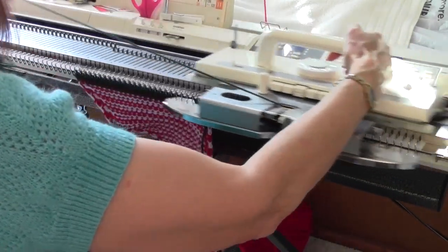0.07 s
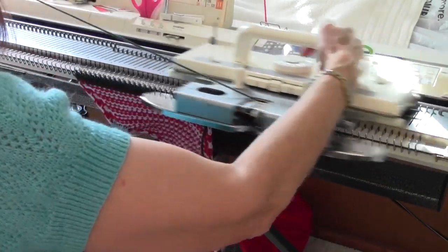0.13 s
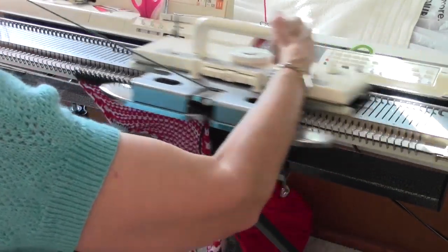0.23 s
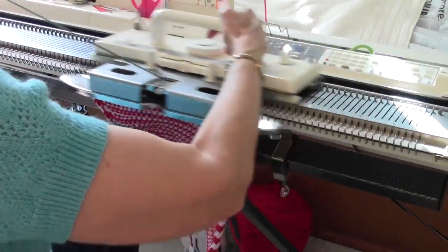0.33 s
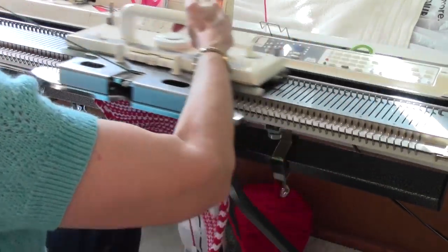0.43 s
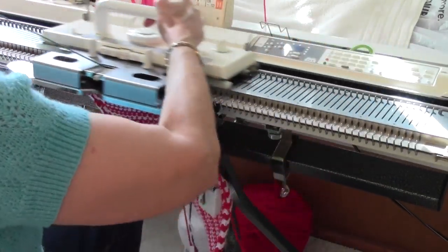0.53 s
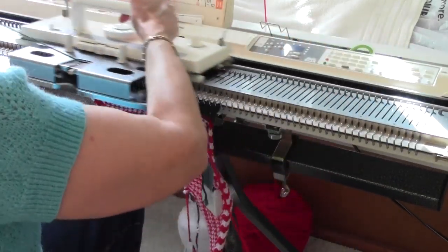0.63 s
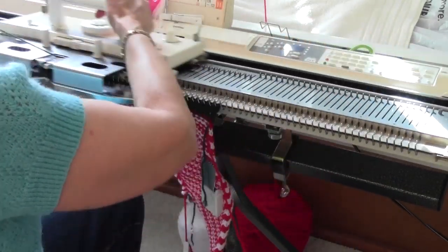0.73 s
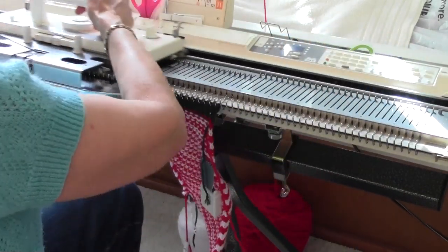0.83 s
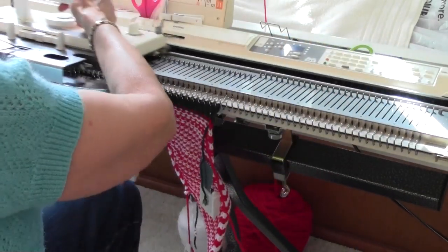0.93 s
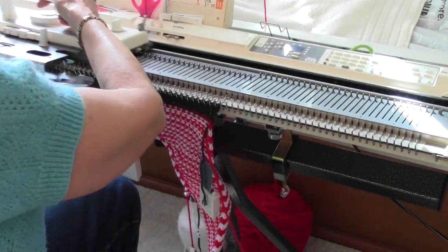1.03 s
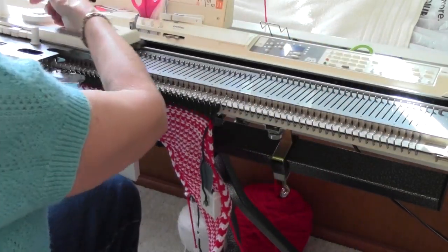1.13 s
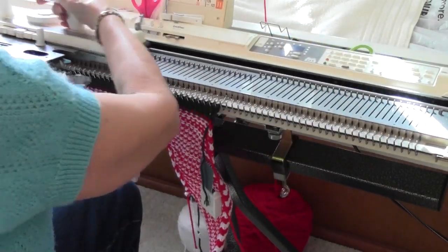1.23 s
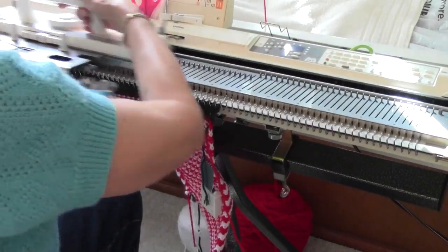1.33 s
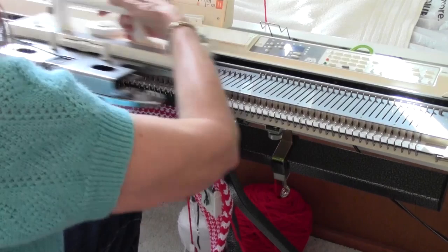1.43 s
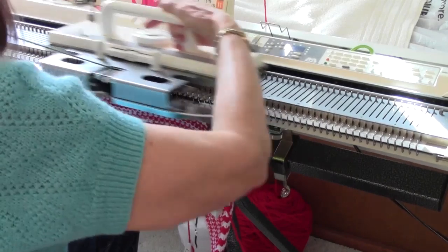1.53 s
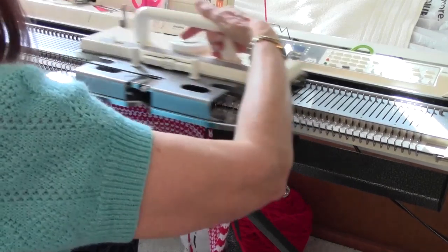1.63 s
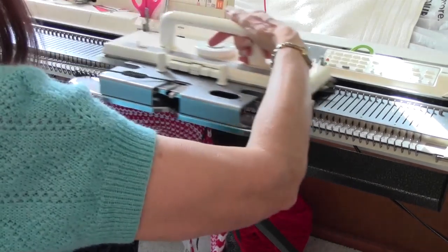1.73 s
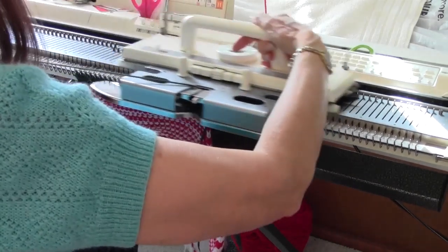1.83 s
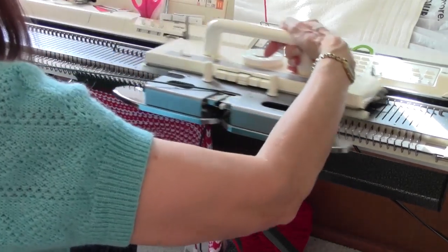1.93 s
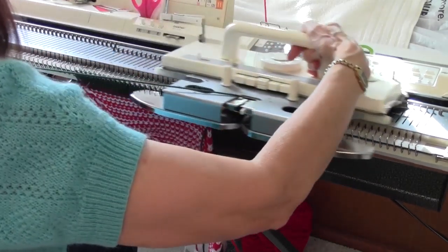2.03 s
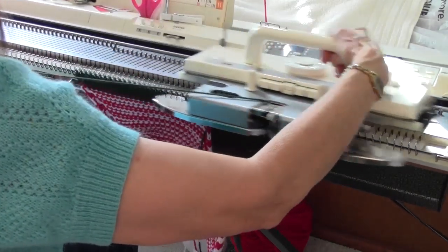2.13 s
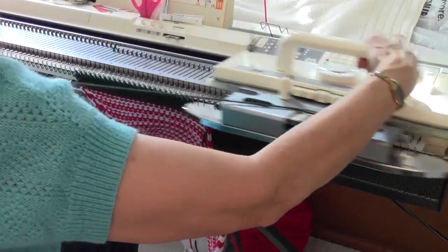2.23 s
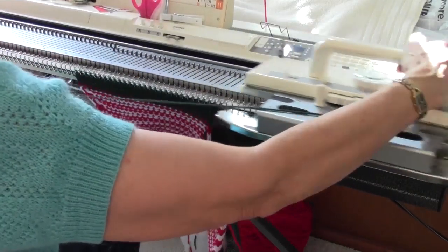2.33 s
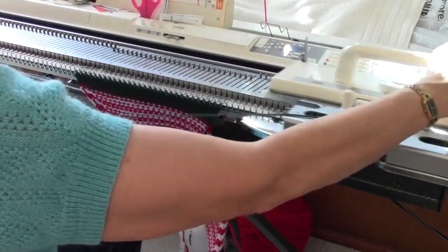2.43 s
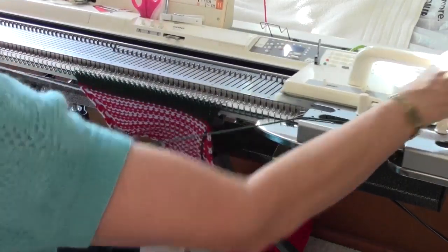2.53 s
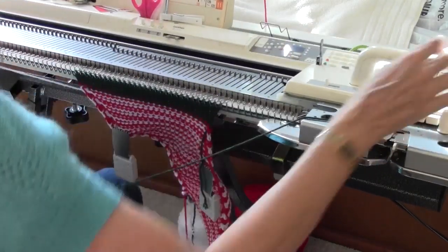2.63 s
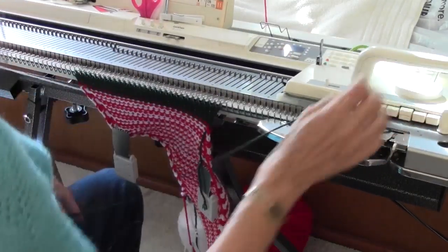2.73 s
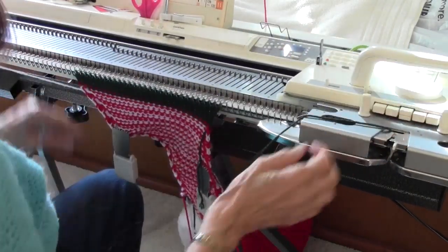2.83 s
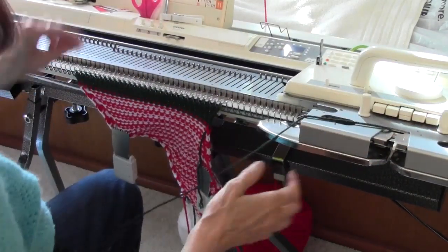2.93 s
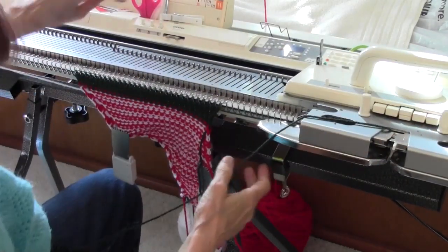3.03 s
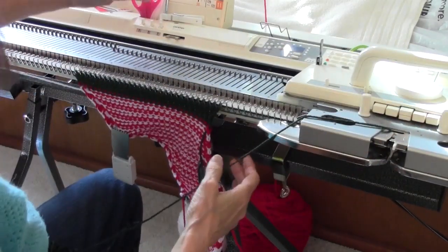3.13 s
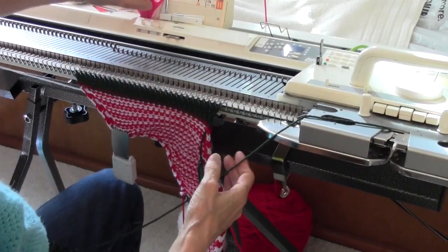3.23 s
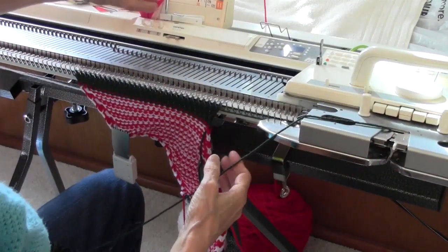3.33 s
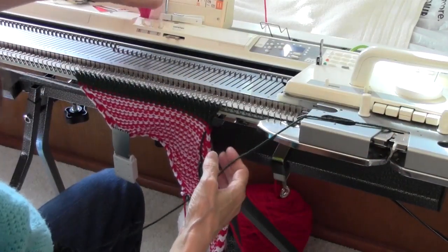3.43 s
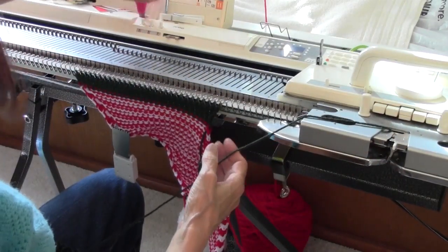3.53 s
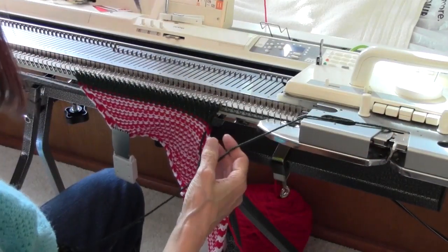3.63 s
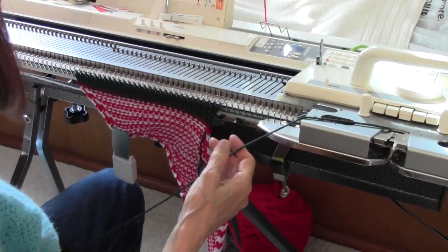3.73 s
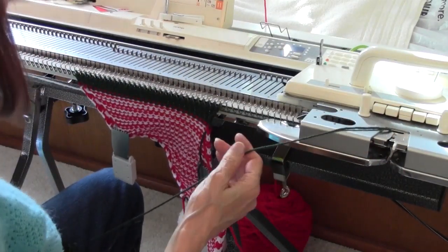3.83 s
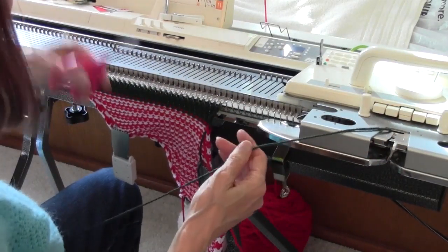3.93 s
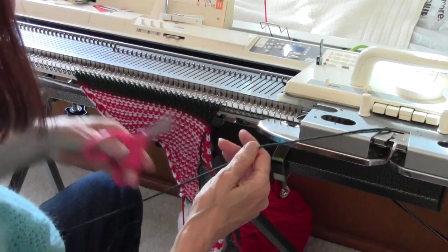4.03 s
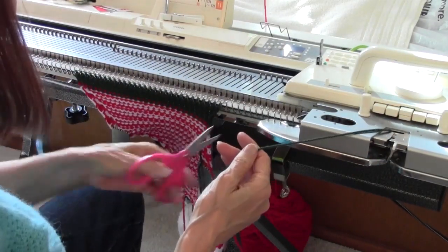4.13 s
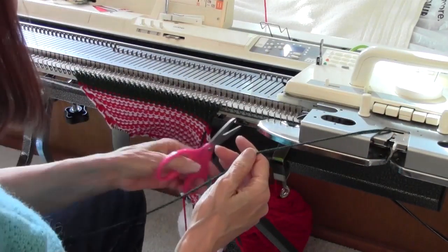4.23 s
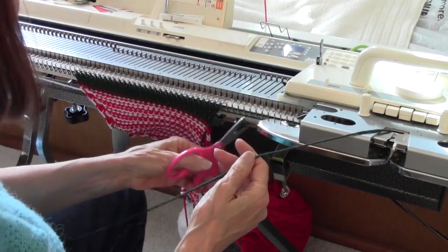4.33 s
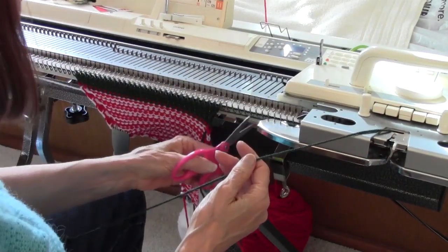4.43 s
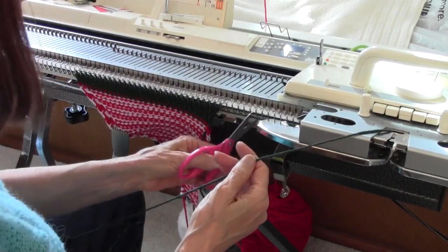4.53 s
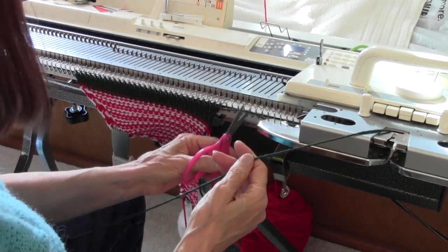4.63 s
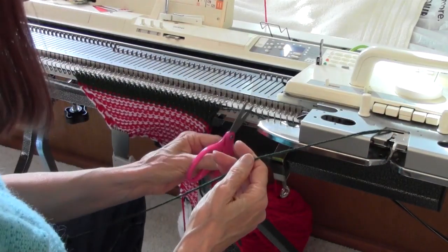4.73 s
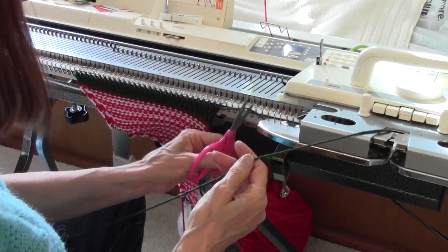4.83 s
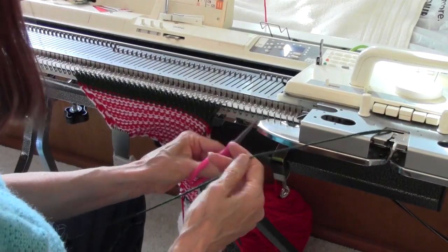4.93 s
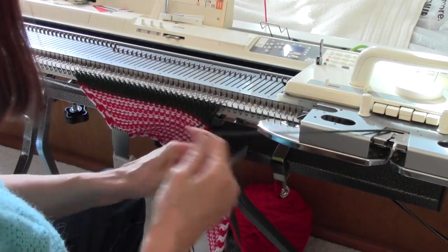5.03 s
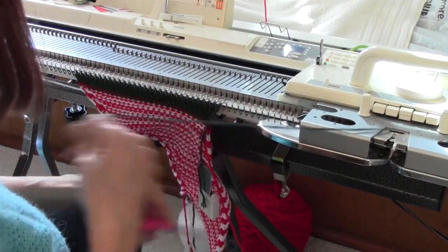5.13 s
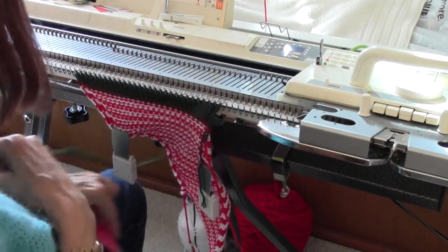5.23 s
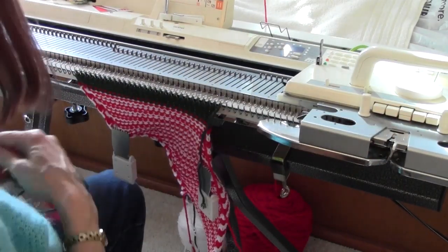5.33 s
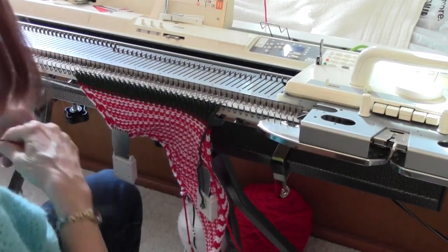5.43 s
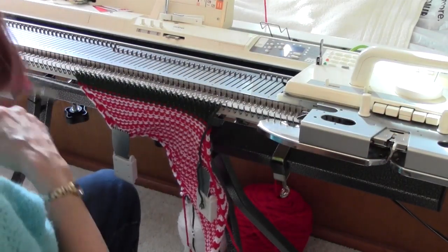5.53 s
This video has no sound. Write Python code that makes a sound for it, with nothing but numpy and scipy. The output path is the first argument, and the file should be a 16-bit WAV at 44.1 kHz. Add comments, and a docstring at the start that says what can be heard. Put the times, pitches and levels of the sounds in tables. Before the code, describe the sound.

Two fast, bright ratcheting strokes of steel needles, nearly a second each, dominate the start, with hard knocks at the ends of travel. Then quieter handling: a sharp knock and loose clatter of scissors against plastic, a pause, small crisp blade clicks and one dry snip through yarn. Close microphone, centred sources, short indoor reflections and steady low room rumble.

```python
"""A small room with a steady low hush; close by, a knitting machine's carriage is pushed left, then back.
Its cams rake the steel needles: bursts of needle hits ring the bed, and the needles ring high above it.
Knocks and lever snaps clack at the ends of each stroke, and the rail groans after the second.
Then scissors scrape and rattle out of a holder behind the machine, ringing its plastic.
The blades click open, rasp once through the yarn and click again; reflections surround it all."""
import sys
import numpy as np
from scipy import signal
from scipy.fft import rfft, irfft
from scipy.io import wavfile

SR = 44100
rng = np.random.default_rng(int(sys.argv[2]) if len(sys.argv) > 2 else 0)


def waveform_to_disk(signal):
    """Save audio, clipped to [-1, 1], as 16-bit WAV at the path in sys.argv[1]."""
    frames = np.transpose(np.atleast_2d(signal))
    scaled = np.clip(frames, -1, 1) * 32767
    samples = np.round(scaled).astype(np.int16)
    wavfile.write(sys.argv[1], SR, samples)


N = 246069

# Carriage pushes: start_s, length_s, run_up_s to the needles, on_needles_s, level_db,
# sag_db_per_s, shove_at_s (a second shove), shove_db
STROKES = [(0.199, .92, 0.047, .68, -15, 13.5, .68, 0.61), (1.427, .87, 0.037, 0.72, -13, 21, 2.02, 3.5)]
# The needles' ring over time: time_s, pitch_hz, unison_share (0-1)
NEEDLE_RING = [(0.25, 10450, .9), (0.38, 10520, 0.6), (0.55, 10460, 0), (1.0, 10290, .05),
               (1.55, 10340, .05), (1.8, 9760, 0.15), (2.05, 10550, 0.57)]
# Spectrum of needles and rail: frequency_hz, relative_db per Hz
CLATTER_SPECTRUM = [(100, -39), (200, -28.5), (340, -11.5), (430, -12), (520, 0), (780, -2.5), (1150, 0),
                    (2000, -0.5), (3500, -1), (6000, 0), (8500, -1), (11500, -2.5), (13200, -7.5),
                    (16000, -9)]
# Steel parts of the needle bed: pitch_hz, relative_db, t60_s
BED_MODES = [(523, -0.5, 0.099), (954, 5, .18), (1195, -2, 0.449), (1364, -4.5, 0.14), (1433, -3, 0.28),
             (1552, 3, 0.4), (2240, -1, 0.22), (2680, 2.5, 0.17), (2923, 3, 0.34), (3433, -1, .16),
             (3670, -3.5, 0.155), (3890, 3.5, 0.073), (4924, 7.5, 0.07), (6080, 6, 0.084)]
# Carriage knocks on the bed: start_s, relative_db, tilt_db_per_octave
CLACKS = [(.096, -45.5, -4), (.12, -43, -1), (.145, -46.5, 1.5), (.1965, -29, 0.5), (.209, -26.5, 2),
          (1.055, -15, -0.5), (1.0595, -7, 0), (1.427, -28.5, 2), (2.489, -33, -6.5), (2.527, -44, -2)]
# Spectrum of those knocks: frequency_hz, relative_db per Hz
CLACK_SPECTRUM = [(30, -70.5), (200, -16.5), (400, -6), (550, 9.5), (800, -4), (1200, 1.5), (2500, 2.5),
                  (4200, 0.5), (7000, 2), (11000, 4), (16000, -15)]
# Levers and cams snapping over at the ends of the bed: start_s, relative_db, tilt_db_per_octave
LEVERS = [(.9625, -5.5, 2.5), (.9775, -9, 0.5), (1.012, -13, 0.5), (1.06, -1, 8), (2.1264, -13, 1),
          (2.158, -12, 0), (2.1965, -5, 0.5), (2.211, -10.5, -2), (2.2646, -15, -2)]
# Spectrum of those snaps: frequency_hz, relative_db per Hz
LEVER_SPECTRUM = [(100, -64), (1100, -18), (1800, -1), (5000, 1.5), (8200, -3.5), (11000, 0),
                  (16000, -20.5)]
# Stops of the carriage, taken by the table: start_s, relative_db
THUDS = [(1.061, -41.5), (2.489, -35), (2.503, -41), (2.528, -44.5)]
# The table's answer to a stop: pitch_hz, relative_db, t60_s
TABLE_MODES = [(125.7, -7.5, 0.4), (148, -3, 0.085), (332.3, 2, 0.076), (475, -25, 0.049),
               (546, 10, 0.0998), (590.6, -11, .06), (750, 4, 0.079)]
# The carriage dragging on its bare rail: start_s, length_s, level_db, pitch_hz
DRAGS = [(2.168, .14, -33.5, 1830), (2.343, 0.138, -46.5, 575)]
# Spectrum of the table's rumble: frequency_hz, relative_db per Hz
RUMBLE_SPECTRUM = [(20, -3), (60, -11.5), (130, 0.5), (220, -3.5), (400, -27.5), (2000, -78.5)]
# Steel parts set ringing by a blow or a scrape: start_s, level_db, pitch_hz, t60_s
PINGS = [(1.011, -31, 3920, .2), (1.06, -24.5, 3860, 0.32), (1.064, -23.5, 1160, 0.28),
         (3.513, -41, 11400, 0.09), (3.566, -42, 11300, 0.28)]
# Scissors knocking against their holder: start_s, level_db, tilt_db_per_octave
RATTLES = [(3.304, -38, -4), (3.324, -24.5, 1.5), (3.3275, -14.5, 3), (3.437, -36, 6), (3.456, -28.5, 1.5),
           (3.471, -34, 4), (3.51, -29, -1.5), (3.517, -24.5, 2.5), (3.527, -24.5, -0.5), (3.566, -31, 9),
           (3.6345, -28.5, -3), (3.669, -24.5, -0.5), (3.685, -20.5, 2.5), (3.703, -26.5, -.5),
           (3.7657, -33, -1.5), (3.786, -39, -4)]
# Spectrum of those knocks and of the sliding: frequency_hz, relative_db per Hz
RATTLE_SPECTRUM = [(30, -69.5), (250, -23), (400, -8), (560, 7), (830, -1), (1200, 4.5), (1700, -1),
                   (2300, 5.5), (3400, 1), (4400, -3), (5200, -9), (8500, -14), (11000, -16), (16000, -30)]
# Hand and scissors sliding on the holder: start_s, length_s, level_db
SCRAPES = [(2.908, 0.15, -59.5), (3.333, 0.061, -37.5), (3.455, 0.097, -41.5), (3.551, 0.073, -38.5),
           (3.717, 0.057, -41.5), (4.068, .025, -50.5)]
# The plastic holder: pitch_hz, relative_db, t60_s
HOLDER_MODES = [(542, -8, 0.096), (620, -6, 0.11), (1220, -12, 0.15), (2120, 2.5, 0.081), (2370, -2, 0.064),
                (3250, -3, 0.14), (3560, -10, 0.15), (4330, -5, 0.088), (5400, 0, .12), (7590, -18, .25),
                (11600, -12, 0.28)]
# Clicks of the blades: start_s, level_db, tilt_db_per_octave
SNIPS = [(4.5787, -20, 2), (4.5978, -29.5, -2), (4.6557, -33, .5), (4.669, -36.5, -3.5), (4.695, -29.5, 4),
         (4.713, -40, -2.5), (4.9944, -41, -6), (5.0215, -36, -3), (5.0245, -20.5, 0.5), (5.3047, -29, 9.5)]
# Spectrum of those clicks: frequency_hz, relative_db per Hz
SNIP_SPECTRUM = [(30, -63), (300, -10.5), (750, 3.5), (1800, -3.5), (3800, -1.5), (7500, 3), (10000, 2),
                 (16000, -10.5)]
# The steel blades: pitch_hz, relative_db, t60_s
BLADE_MODES = [(850, -3, 0.18), (1295, -2, 0.45), (1685, -3, 0.112), (2420, -3, 0.11), (3828, -6, 0.16),
               (5790, -6, 0.1), (9900, -4, 0.1), (12020, -11, 0.11)]
# The blades shearing through the yarn: start_s, level_db, tilt_db_per_octave
CUTS = [(5.026, -38.5, -2.5)]
# Spectrum of the cut yarn: frequency_hz, relative_db per Hz
SHEAR_SPECTRUM = [(100, -61), (1500, -27), (3000, -12), (4200, -1), (6600, 0), (7800, -18), (16000, -25)]
# Decay of the small room: frequency_hz, t60_s
ROOM_DECAY = [(150, 0.59), (1000, .36), (4000, 0.36), (9000, 0.19), (16000, 0.23)]
# How far the reflections differ left and right: frequency_hz, side_to_mid_db
SPREAD = [(300, -6), (1000, -25), (2500, -84.5), (4500, -23), (9000, -5), (13000, -8)]
# Spectrum of the room's hush: frequency_hz, relative_db per Hz
HUSH_SPECTRUM = [(12, -33.5), (20, -4.5), (107, -2), (142, 1.5), (241, -7.5), (270, -2), (337, -9.5),
                 (410, -5.5), (446, -10), (698, -10.5), (825, -16.5), (897, -14), (2530, -22.5),
                 (6540, -29), (16000, -37)]
# Left-right likeness of the hush: frequency_hz, likeness (0-1)
LIKENESS = [(30, 1), (150, 0.38), (500, 0.4), (2000, 0.6), (12000, 0.4)]

# The arm takes up the carriage from a soft start, and lets it run out
START_DB, ATTACK_S, RELEASE_S, SHOVE_S = -17, .085, .016, .06
# The cams run into and out of the working needles; the bare bed is quieter
ENTER_S, LEAVE_S, BARE_DB = .025, .045, -4
# Needles passed per s, at no effort and at an effort of one
CRAWL_RATE, FULL_RATE = 30, 170
# The needles' ring sags faster than the clatter
RING_POWER = 1.4
# A blow lasts twice as long when it is duller by this tilt (dB per octave)
SOFT_TILT_DB = 5.5
HUSH_DB = -47.5
# The recorder rounds off peaks towards CEILING (full scale 1), and passes no treble above EDGE_HZ
CEILING, EDGE_HZ = .84, 15900


def amp(db):
    """Decibels to gain."""
    return 10 ** (np.asarray(db) / 20)


def evened(x):
    """Scales to an rms of one."""
    return x / np.sqrt(np.mean(x ** 2) + 1e-20)


def read(points, hz):
    """Reads a table on a log-frequency axis."""
    f, value = np.transpose(points)
    return np.interp(np.log(hz + 1), np.log(f + 1), value)


def curve(rows, axis=1):
    """One column of a table of times, for every sample."""
    rows = np.asarray(rows)
    return np.interp(np.arange(N) / SR, rows[:, 0], rows[:, axis])


def add(mix, s, sound):
    """Lays a sound into the mix at time s."""
    part = mix[round(s * SR):][:len(sound)]
    part += sound[:len(part)]


def held(start, length, rise_s, fall_s):
    """An envelope: rises, holds at one, and dies away after its length."""
    t = np.arange(N) / SR - start
    return np.clip(t / rise_s, 0, 1) * np.exp(-np.maximum(t - length, 0) / fall_s)


def colour(x, spectrum, tilt_db=0):
    """Gives x a spectrum, tilted per octave, at an rms of one."""
    hz = np.fft.rfftfreq(len(x), 1 / SR)
    gain = amp(read(spectrum, hz) + tilt_db * np.log2(hz + 1))
    return evened(irfft(rfft(x) * gain, len(x)))


def resonate(x, hz, width):
    """A moving resonance: shifts hz down to zero, smooths, and shifts back."""
    turn = np.exp(2j * np.pi * np.cumsum(hz) / SR)
    r = np.exp(-np.pi * width / SR)
    smooth = signal.lfilter([1 - r], [1, -2 * r, r * r], x / turn)
    return evened((turn * smooth).real)


def ring(x, modes):
    """What a body answers to x: decaying sines that start at full strength, the whole with an energy of one."""
    t = np.arange(SR // 2) / SR
    body = sum(amp(db - 60 * t / t60) * np.sin(2 * np.pi * hz * t) for hz, db, t60 in modes)
    return signal.oaconvolve(x, body / np.linalg.norm(body))[:N]


def blows(rows, spectrum, rise_s, fade_s):
    """Each blow is a burst of tiny contacts that fades within milliseconds; dull ones last longer."""
    out, t = np.zeros(N), np.arange(SR // 8) / SR
    for s, db, tilt_db in rows:
        fade = np.exp(-t / fade_s * 2 ** (tilt_db / SOFT_TILT_DB))
        shape = fade * (1 - np.exp(-t / rise_s))
        burst = shape * colour(rng.standard_normal(len(t)), spectrum, tilt_db)
        add(out, s, amp(db) * burst * np.linalg.norm(shape) / np.linalg.norm(burst))
    # small parts radiate no bass
    return signal.sosfilt(signal.butter(2, 250, "high", fs=SR, output="sos"), out)


def motion():
    """The arm's effort swells, sags and gets a second shove; it sets speed, clatter and needle ring."""
    t, effort, push, bare, shimmer = np.arange(N) / SR, 0, 0, 0, 0
    for start, length, run_up, engaged, db, sag_db, shove_at, shove_db in STROKES:
        age = np.maximum(t - start, 0)
        shove = np.exp(-((t - shove_at) / SHOVE_S) ** 2)
        drive = amp(shove_db * shove - sag_db * age)
        soft_start = amp(START_DB * np.maximum(1 - age / ATTACK_S, 0))
        stroke = drive * soft_start * held(start, length, .002, RELEASE_S)
        on_needles = held(start + run_up, engaged, ENTER_S, LEAVE_S)
        effort = effort + stroke
        push = push + amp(db) * stroke * on_needles
        bare = bare + amp(db + BARE_DB) * stroke * (1 - on_needles)
        shimmer = shimmer + amp(db) * on_needles * drive ** RING_POWER
    speed = CRAWL_RATE + (FULL_RATE - CRAWL_RATE) * np.sqrt(effort)
    travel = np.cumsum(speed) / SR  # counted in needles
    return travel, push, bare, shimmer


def needle_hits(travel, spread_db, jitter_s, chatter_s, cams):
    """Every needle butt strikes each cam in turn, a little early or late, and chatters in its slot."""
    hits = np.zeros(N)
    t = np.arange(SR // 50) / SR
    for _ in range(cams):
        times = np.flatnonzero(np.diff(np.floor(travel + rng.random()))) / SR
        size, late = rng.standard_normal((len(times), 2)).T
        chatter = rng.standard_normal((len(times), len(t))) * np.exp(-t / chatter_s)
        levels_db = spread_db * np.minimum(size, 2)
        for s, db, burst in zip(times + jitter_s * late, levels_db, chatter):
            add(hits, abs(s), amp(db) * burst)
    return evened(hits)


def carriage(travel, push, bare, shimmer):
    """Needle hits and rail friction sound the bed; the needles themselves ring high."""
    hits = needle_hits(travel, spread_db=1.5, jitter_s=.0008, chatter_s=.0024, cams=6)
    friction = amp(-5) * rng.standard_normal(N)
    drive = evened(hits + friction)
    clatter = push * colour(drive, CLATTER_SPECTRUM)
    clatter = clatter + bare * colour(drive, CLATTER_SPECTRUM, tilt_db=-1)
    # needles in unison give a narrow ring and its overtone; unlike needles smear it
    hz, unison = curve(NEEDLE_RING), np.clip(curve(NEEDLE_RING, axis=2), 0, 1)
    alike, unlike = hits * rng.standard_normal((2, N))
    overtone = amp(-12) * resonate(alike, 1.33 * hz, width=440)
    narrow = resonate(alike, hz, width=710) + overtone
    smeared = resonate(unlike, hz, width=2230)
    needles = amp(3) * np.sqrt(unison) * narrow + np.sqrt(1 - unison) * smeared
    return clatter + amp(-20) * ring(clatter, BED_MODES) + amp(-7.5) * shimmer * needles


def clacks():
    """Knocks and lever snaps ring the bed; the table answers each stop."""
    knocks = blows(CLACKS, CLACK_SPECTRUM, rise_s=.00064, fade_s=.005)
    snaps = blows(LEVERS, LEVER_SPECTRUM, rise_s=.00084, fade_s=.002)
    cracks = amp(1) * knocks + amp(1) * snaps
    pushes = np.zeros(N)
    for s, db in THUDS:
        add(pushes, s, amp([db + 27]))  # a push of a single sample
    return cracks + amp(-16) * ring(cracks, BED_MODES) + ring(pushes, TABLE_MODES)


def frame():
    """The rail groans under the dragging carriage; the table rumbles under strokes and sways with drags."""
    groan, shake = 0, 0
    for start, length, db, hz in DRAGS:
        note = resonate(rng.standard_normal(N), np.full(N, hz), width=800)
        rasp = amp(-10) * colour(rng.standard_normal(N), CLATTER_SPECTRUM, tilt_db=-2.5)
        groan = groan + amp(db) * held(start, length, rise_s=.011, fall_s=.014) * (note + rasp)
        shake = shake + amp(-54) * held(start, length, rise_s=.13, fall_s=.063)
    for start, length, *_ in STROKES:
        shake = shake + amp(-51.5) * held(start, length, rise_s=.1, fall_s=.15)
    return groan + shake * colour(rng.standard_normal(N), RUMBLE_SPECTRUM)


def pings():
    """Short, rough notes of steel: narrow bands of noise that die away."""
    out, t = np.zeros(N), np.arange(SR // 3) / SR
    for s, db, hz, t60 in PINGS:
        note = resonate(rng.standard_normal(len(t)), np.full(len(t), hz), width=160)
        add(out, s, amp(db - 60 * t / t60) * note)
    return out


def fetch():
    """The scissors knock and scrape their way out of a plastic holder, which rings."""
    caught = rng.random(N) < 3000 / SR  # about 3000 slips per s
    slips = rng.standard_normal(N) * amp(4 * rng.standard_normal(N)) * caught
    sliding = sum(amp(db) * held(start, length, rise_s=.01, fall_s=.015) for start, length, db in SCRAPES)
    knocks = blows(RATTLES, RATTLE_SPECTRUM, rise_s=.00058, fade_s=.012)
    contact = knocks + sliding * colour(slips, RATTLE_SPECTRUM)
    return contact + amp(-16) * ring(contact, HOLDER_MODES)


def scissors():
    """Sharp clicks, a faint ring of steel while the blades are free, and the rasp of the cut."""
    clicks = blows(SNIPS, SNIP_SPECTRUM, rise_s=.00033, fade_s=.002)
    free = np.arange(N) / SR < CUTS[0][0] - .1  # until shortly before the cut
    cut = blows(CUTS, SHEAR_SPECTRUM, rise_s=.00078, fade_s=.016)
    return clicks + amp(-8) * ring(clicks * free, BLADE_MODES) + cut


def room(x):
    """Sparse reflections, each band dying at its own speed, nearly alike left and right."""
    taps = rng.choice([-1., 1.], (2, SR // 2)) * (rng.random((2, SR // 2)) < 4000 / SR)
    taps[:, :round(.003 * SR)] = 0  # nothing returns within 3 ms
    hz, t, z = signal.stft(taps, SR, nperseg=256)
    z[1] *= amp(read(SPREAD, hz))[:, None]
    decay = amp(-60 * t / read(ROOM_DECAY, hz)[:, None])
    tail = signal.istft(z * decay, SR, nperseg=256)[1]
    mid, side = signal.fftconvolve(x[None], tail / np.linalg.norm(tail[0]), axes=1)[:, :N]
    return np.array([mid + side, mid - side])


def moving_room(x, travel, count=4):
    """The pattern of reflections shifts as the sources move: it glides from one to the next."""
    place = travel / 60  # a full round every 60 needles
    shares = [np.maximum(np.cos(2 * np.pi * (place - k / count)), 0) for k in range(count)]
    return sum(room(x * share) for share in shares)


def hush():
    """The room's steady low rumble: coloured noise, partly unlike left and right."""
    a, b = rfft(rng.standard_normal((2, N)))
    same = np.clip(read(LIKENESS, np.fft.rfftfreq(N, 1 / SR)), -1, 1)
    pair = irfft([a, same * a + np.sqrt(1 - same ** 2) * b], N)
    return amp(HUSH_DB) * np.array([colour(side, HUSH_SPECTRUM) for side in pair])


def scene():
    """Machine and scissors in the middle, the room around them."""
    travel, push, bare, shimmer = motion()
    stroke = carriage(travel, push, bare, shimmer) + frame()
    clack, rattle, snip = clacks(), fetch(), scissors()
    # each source's share of reflections
    sent = amp(-10.5) * stroke + amp(-3.5) * clack + amp(-7.5) * rattle + amp(-8) * snip
    return stroke + clack + rattle + snip + pings() + moving_room(sent, travel) + hush()


def record(dry):
    """The highest peaks are rounded off; then the band limit."""
    rounded = dry / (1 + (dry / CEILING) ** 6) ** (1 / 6)
    lowpass = signal.firwin(511, EDGE_HZ, window=("kaiser", 9), fs=SR)
    return signal.oaconvolve(rounded, lowpass[None], "same")


dry = scene()
out = record(dry)
waveform_to_disk(out)
```